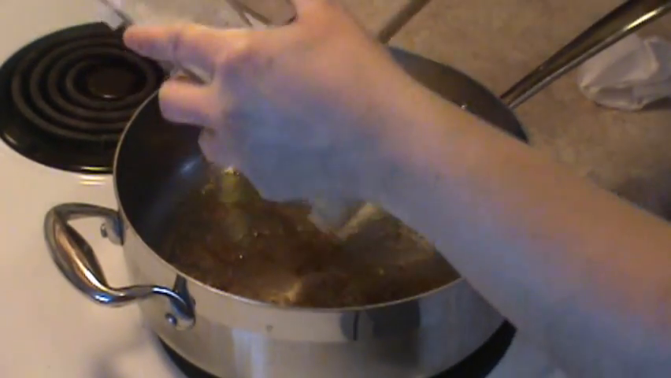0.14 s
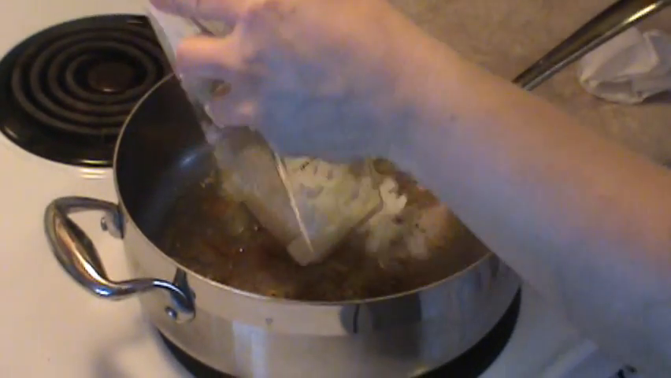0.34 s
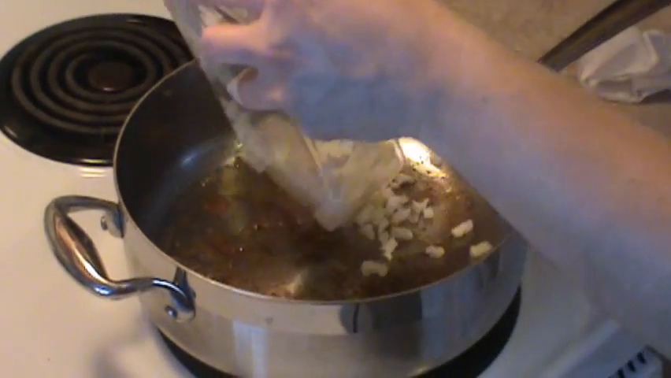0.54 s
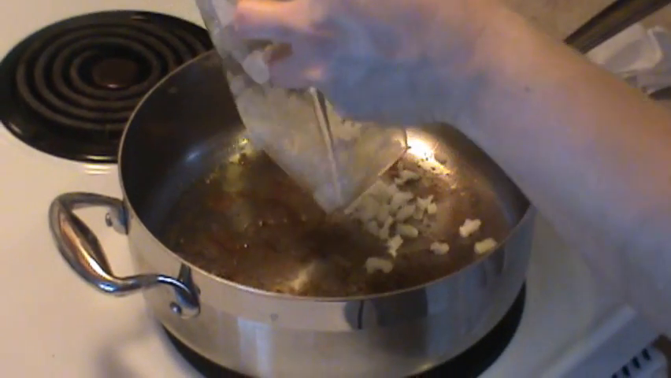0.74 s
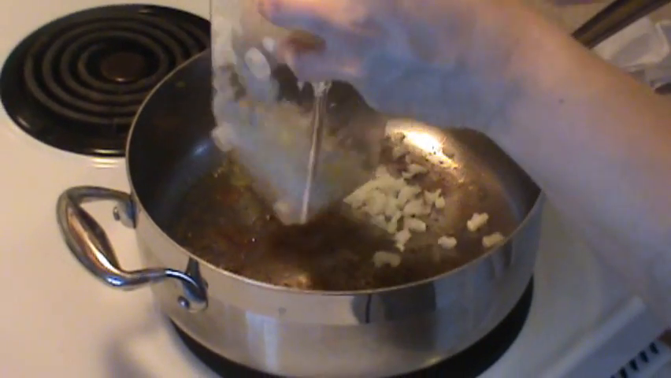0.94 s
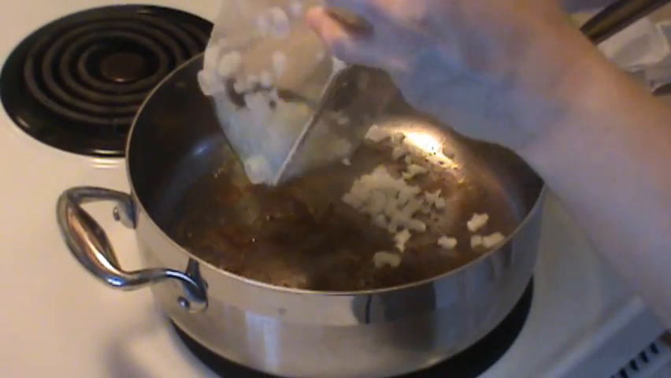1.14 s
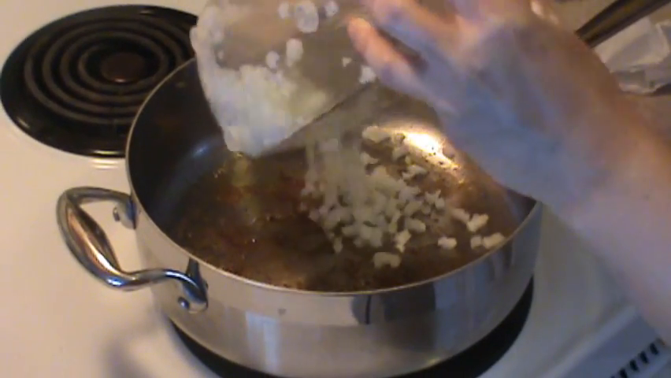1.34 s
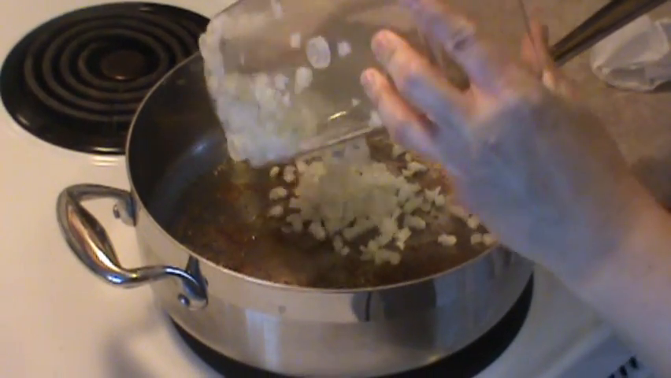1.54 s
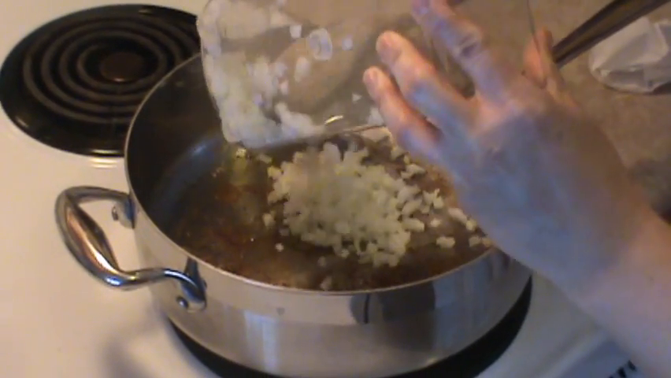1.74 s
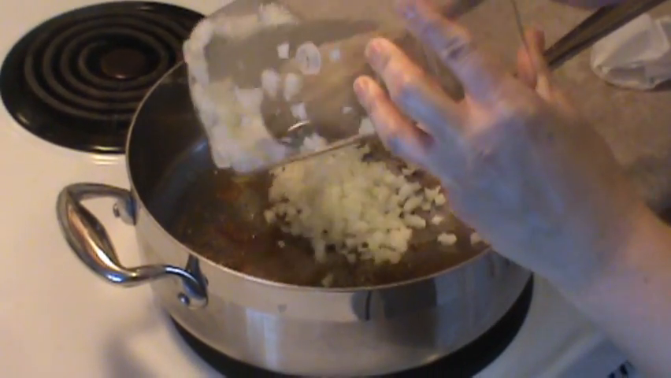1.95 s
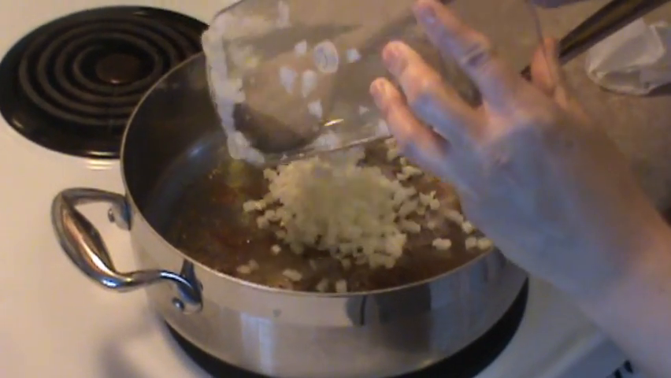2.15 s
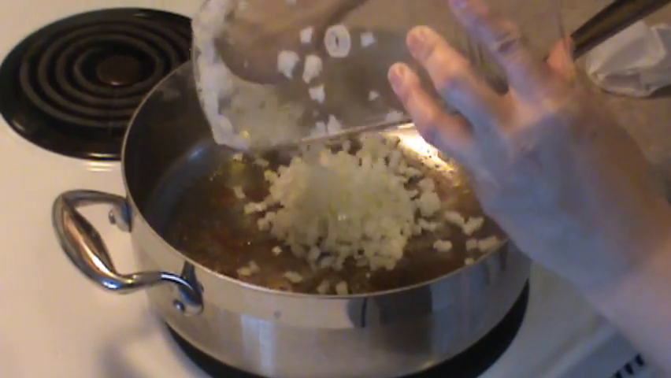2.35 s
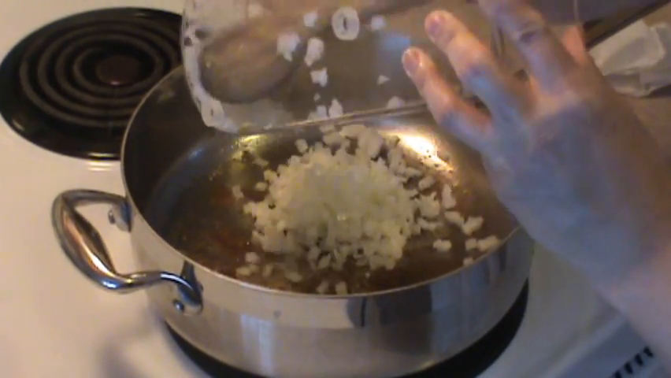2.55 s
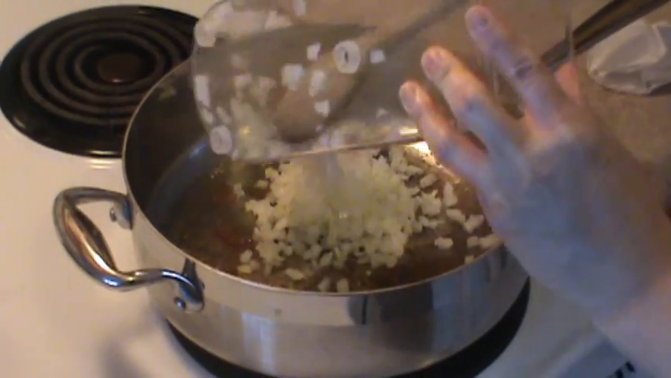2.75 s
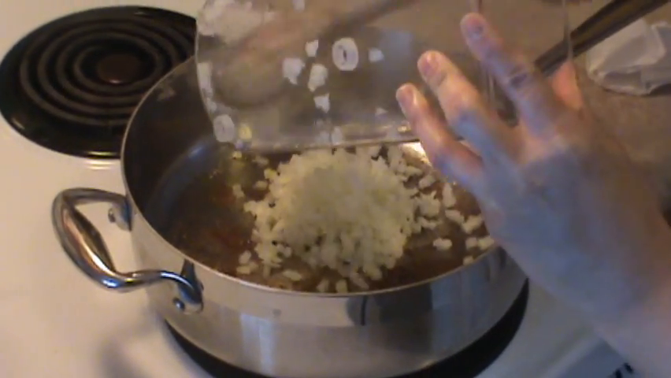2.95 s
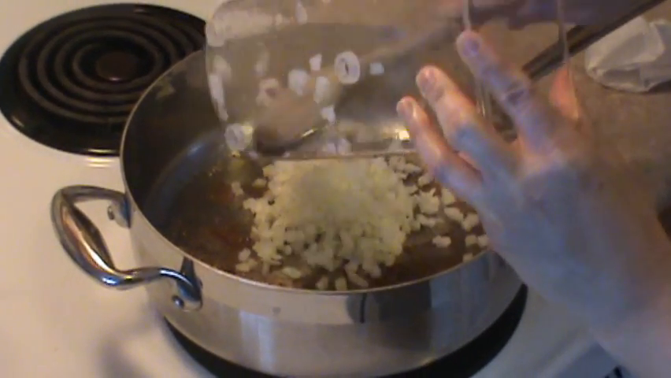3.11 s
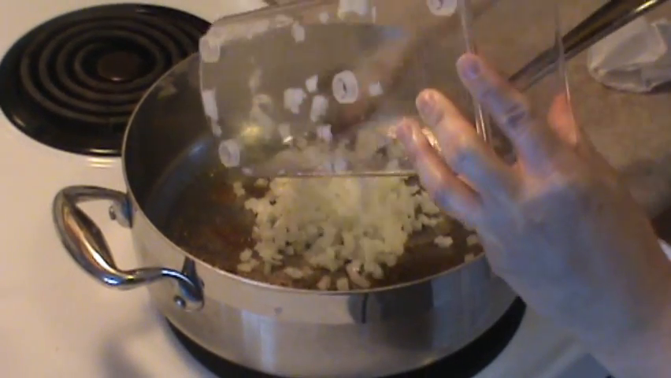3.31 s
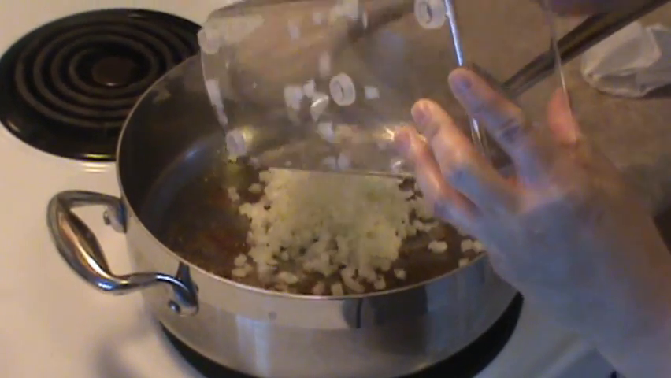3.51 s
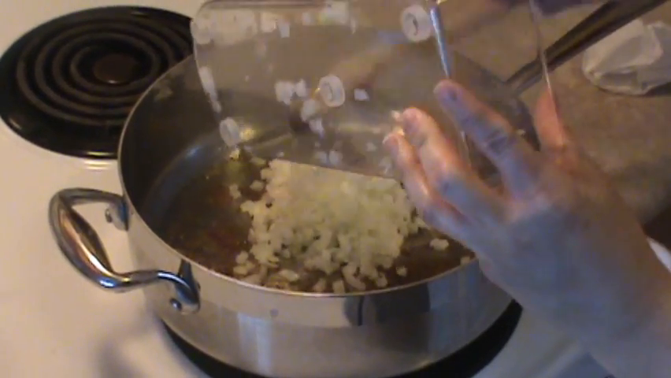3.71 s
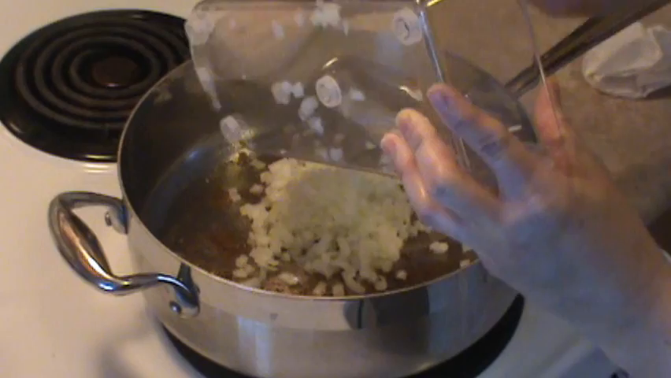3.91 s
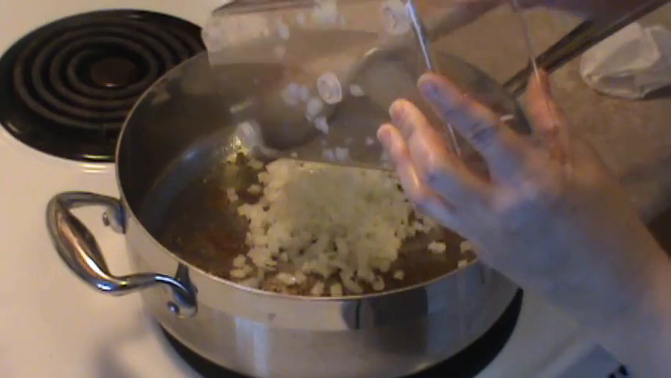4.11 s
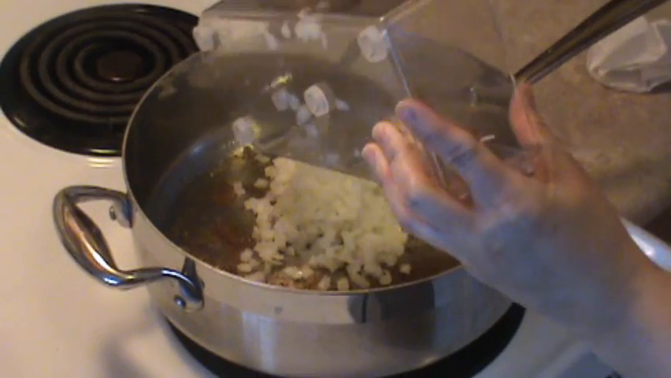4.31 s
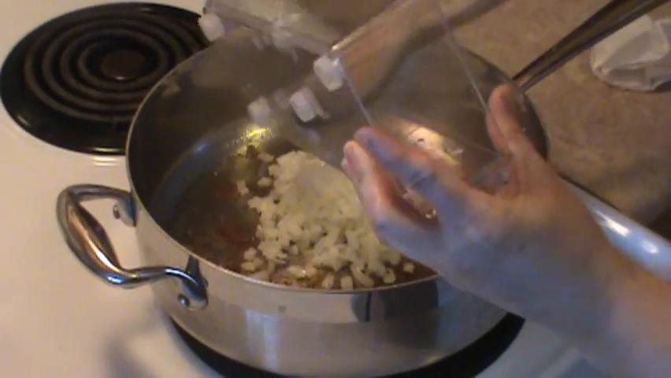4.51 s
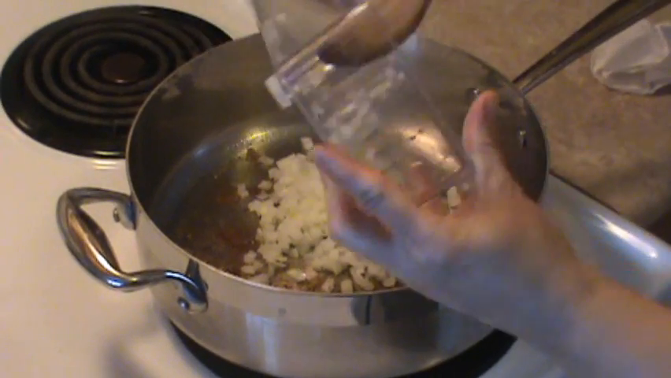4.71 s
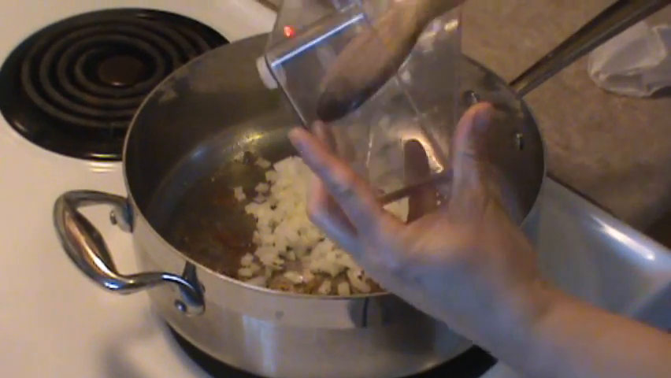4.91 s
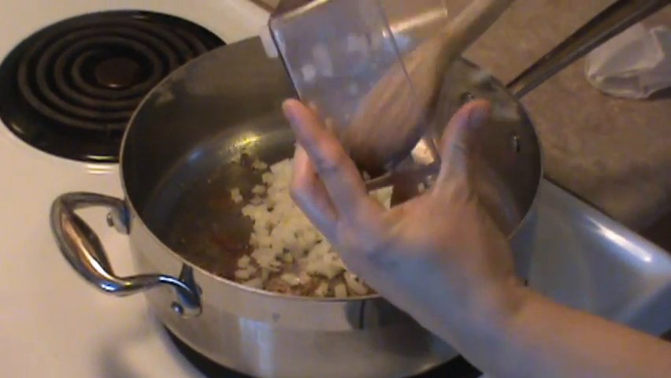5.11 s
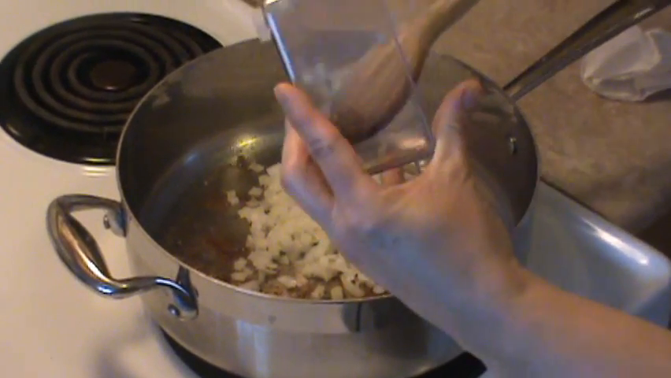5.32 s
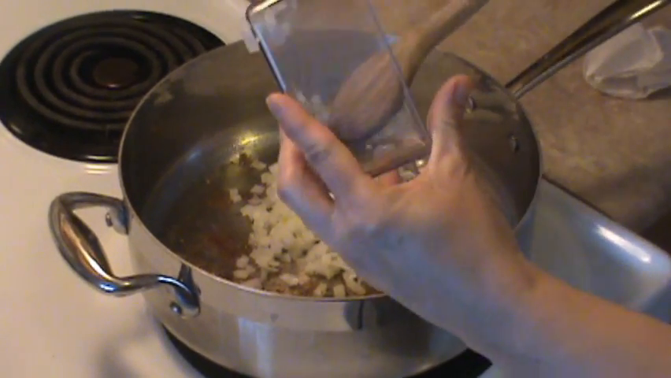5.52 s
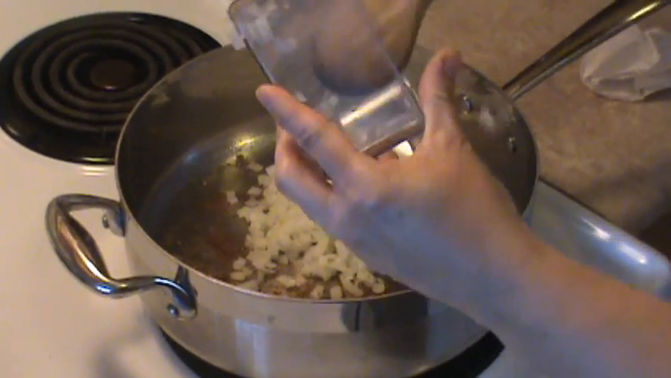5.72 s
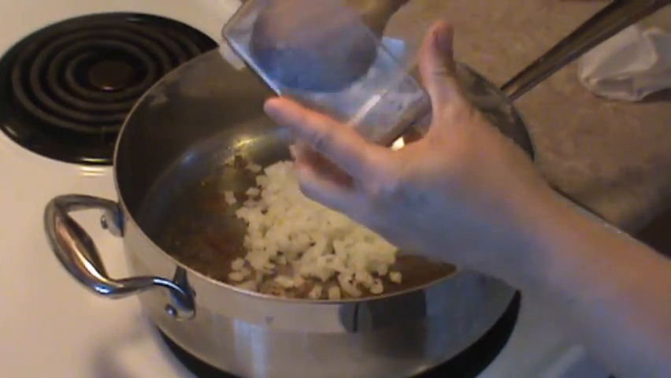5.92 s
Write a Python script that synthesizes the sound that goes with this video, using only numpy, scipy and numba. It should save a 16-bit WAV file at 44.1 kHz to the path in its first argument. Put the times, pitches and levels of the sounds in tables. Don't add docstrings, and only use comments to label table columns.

```python
import sys
import numpy as np
from scipy import signal
from scipy.fft import rfft, irfft
from scipy.io import wavfile
from scipy.ndimage import uniform_filter1d, minimum_filter1d
from numba import njit

SR = 44100
rng = np.random.default_rng(int(sys.argv[2]) if len(sys.argv) > 2 else 0)


def unload_wav(signal):
    wavfile.write(
        sys.argv[1],
        SR,
        np.round(np.clip(np.atleast_2d(signal).T, -1, 1) * 32767).astype(np.int16),
    )


def voltage_ratio(level):
    return 10 ** (np.asarray(level, float) / 20)


N = 267246
T = np.arange(N) / SR
LEAD = 4410


def level(x, db):
    return x * voltage_ratio(db) / np.sqrt(np.mean(x ** 2))


def on_log(table, hz):
    f, v = np.transpose(table)
    return np.interp(np.log(np.maximum(hz, 1)), np.log(f), v)


def colour(x, gain_db):
    cepstrum = irfft(gain_db(np.arange(1025) * SR / 2048) * np.log(10) / 20)
    cepstrum[1:1024] *= 2
    cepstrum[1025:] = 0
    impulse = irfft(np.exp(rfft(cepstrum)))[:1024]
    return signal.oaconvolve(x, impulse)[:len(x)]


def band(x, hz, width):
    edges = [hz - width / 2, min(hz + width / 2, 0.45 * SR)]
    return signal.sosfilt(signal.butter(1, edges, "bandpass", fs=SR, output="sos"), x)


def walk(rate):
    hold = int(SR / rate)
    steps = np.repeat(rng.standard_normal(N // hold + 1), hold)[:N]
    return 1.3 * uniform_filter1d(uniform_filter1d(steps, hold), hold)


@njit
def follower(x, attack, release):
    e, out = 0., np.empty(len(x))
    for i in range(len(x)):
        e += (x[i] - e) * (attack if x[i] > e else release)
        out[i] = e
    return out


def kitchen():
    # [f/Hz, density/dB]
    air_spectrum = [(15, -28), (25, -9.5), (119, -11.5), (300, -8), (1050, -3.5), (1500, -7), (4930, -17.5),
                    (15700, -25)]
    # [f/Hz, width/Hz, level/dB]
    hum = [(79.5, 16, -69.5), (122, 4.6, -78)]
    air = np.array([colour(rng.standard_normal(N), lambda hz: on_log(air_spectrum, hz)) for _ in range(2)])
    drone = 0
    for hz, width, db in hum:
        noise = rng.standard_normal((2, N))
        drone = drone + level(band(band(noise, hz, width), hz, width), db)
    mid, side = level(air, -54.5) + drone
    return mid + 0.37 * side * np.array([[1], [-1]])


def room(x):
    # [f/Hz, t60/s]
    room_t60 = [(250, 0.33), (1000, 0.39), (3000, 0.33), (8000, 0.52)]
    t = np.arange(SR) / SR
    shared, own = rng.standard_normal(SR), rng.standard_normal((2, SR))
    tail = 0
    for hz in 200 * 2 ** np.arange(-0.5, 6, 0.5):
        decay = 1000 ** (-t / on_log(room_t60, hz))
        tail = tail + band(shared + 0.72 * own, hz, hz / 3) * decay
    tail = tail * np.clip((t - 0.002) / 0.0057, 0, 1)
    tail = tail / np.sqrt(np.mean(np.sum(tail ** 2, axis=1)))
    return signal.fftconvolve(x[None], tail, axes=1)[:, :len(x)]


def scrapes():
    # [start/s, length/s, level/dB, ring/Hz]
    strokes = [
        (0.274, 0.076, -52, 606),
        (0.341, 0.035, -50, 2580),
        (0.458, 0.092, -43.5, 943),
        (1.22, 0.11, -49, 930),
        (5.015, 0.056, -45, 680),
        (5.22, 0.086, -70, 641),
    ]
    grip, fade_db = 0.31, 15
    ticks = (rng.random(N) < 900 / SR) * voltage_ratio(3.0 * rng.exponential(size=N)) * rng.standard_normal(N)
    out = np.zeros(N)
    for s, length, db, hz in strokes:
        ring = level(band(ticks, hz, 47), 0)
        rasp = level(band(ticks, 2040, 1200), -6.5)
        along = (T - s) / length
        stroke = np.clip(along / grip, 0, 1) ** 2 * voltage_ratio(-fade_db * np.clip(along - grip, 0, 1))
        out += (ring + rasp) * voltage_ratio(db) * stroke * (along < 1)
    return out


def blow(struck_hz, answer_hz, hard_db):
    # [f/Hz, level/dB, t60/s]
    tub = [(177, 10.5, 0.12), (270, 21, 0.049), (426, 7.5, 0.13), (562, 9.5, 0.17), (604, 8, 0.093),
           (627, 8.5, 0.099), (803, 8, 0.078), (867, 9.5, 0.072), (884, 14.5, 0.03), (1085, 12, 0.065),
           (1206, -1.5, 0.093), (1270, 13, 0.02), (1580, 4, 0.044), (1758, 11.5, 0.027), (1895, 2.5, 0.2),
           (2010, 11, 0.092), (2196, 24.5, 0.012), (2406, 22, 0.029), (2565, 12.5, 0.035),
           (3310, 6.5, 0.021)]
    # [f/Hz, level/dB]
    singers = [(560, -10), (610, -6.5), (890, -10.5), (1240, 3), (1830, 3.5), (2170, -5), (2400, -14),
               (3050, -1)]
    t = np.arange(SR // 5) / SR
    low_hz, high_hz = min(struck_hz, answer_hz), max(struck_hz, answer_hz)
    contact = np.clip(t / (0.00039 * voltage_ratio(-0.75 * hard_db)), 0, 1)

    def away(f):
        return np.minimum(np.abs(np.log2(f / struck_hz)), np.abs(np.log2(f / answer_hz)))

    def fall(f):
        return -7.5 * away(f) + 0.5 * max(np.log2(f / high_hz), 0)

    thud_db = -27 - 12.5 * np.log2(low_hz / 560)
    shape = [(90, thud_db - 17), (170, thud_db + 10.5), (330, thud_db + 4.5),
             (560, fall(660) - 2.2), (1050, fall(900) - 1.5), (2100, fall(1440) - 0.5 + 0.17 * hard_db),
             (3100, fall(2740) / 2 + 0.55 * hard_db + 2.5), (4000, hard_db - 0.5), (5600, hard_db - 4.5),
             (7000, hard_db - 19), (10000, hard_db - 23.5)]

    hz, mode_db, t60 = np.transpose(tub)[:, :, None]
    size, tune, turn = rng.standard_normal((3, len(tub), 1))
    modes = voltage_ratio(mode_db + on_log(shape, hz) + 1.4 * size) * 1000 ** (-t / t60)
    walls = np.sum(modes * np.sin(2 * np.pi * (hz * (1 + 0.011 * tune) * t + turn)), axis=0)

    ringers = list(singers) + [(struck_hz, 4.5), (answer_hz, 0)]
    ring_hz, ring_db = np.transpose(ringers)[:, :, None]
    ring_db = ring_db - 17.5 * away(ring_hz) - 0.14 * min(hard_db + 12, 0)
    ring_t60 = 0.095 * (700 / ring_hz) ** 0.6
    ring = voltage_ratio(ring_db + 12.0) * 1000 ** (-t / ring_t60)
    singing = np.sum(ring * np.sin(2 * np.pi * ring_hz * t), axis=0)

    rattle = rng.standard_normal(len(t)) * contact * voltage_ratio(27.5) * 1000 ** (-t / 0.075)
    crack = voltage_ratio(43 + 0.67 * hard_db) * (t == 0)
    return contact * (walls + singing) + colour(rattle + crack, lambda f: on_log(shape, f))


def knocks():
    # [t/s, peak/dB, wall struck/Hz, wall that answers/Hz, hardness/dB]
    hits = [(-0.042, -16.5, 788, 2080, -11), (0.348, -44, 604, 2530, -15), (0.618, -14, 883, 4010, -3.5),
            (0.666, -19.5, 569, 832, -22), (1.353, -14.5, 1980, 804, 2.5), (1.444, -31, 560, 990, -9),
            (1.98, -18.5, 707, 910, -8.5), (2.422, -15, 1250, 2460, -7.5), (2.441, -17.5, 1338, 909, -31),
            (3.021, -13, 890, 1320, -21), (3.057, -14, 2115, 612, -4), (3.548, -13.5, 567.5, 1234, -2.5),
            (3.993, -10.5, 890, 1810, -5.5), (4.258, -13, 1803, 906, -10.5), (4.448, -21.5, 1027, 620, -4),
            (4.498, -9, 805, 2320, -13), (5.053, -17.5, 1075, 611, -19.5), (5.108, -34, 1260, 950, -33),
            (5.18, -31.5, 602, 588.5, -39), (5.439, -41.5, 935, 600, -1), (5.717, -14, 913, 2460, -10),
            (5.749, -24, 783, 656, -18), (5.947, -24, 615, 1670, -13)]
    out = np.zeros(N + LEAD + SR // 5)
    for s, db, struck_hz, answer_hz, hard_db in hits:
        hit = blow(struck_hz, answer_hz, hard_db)
        i = int(s * SR) + LEAD
        out[i:i + len(hit)] += hit * voltage_ratio(db + 8.0) / np.abs(hit).max()
    return signal.sosfilt(signal.butter(2, 110, "highpass", fs=SR, output="sos"), out[:N + LEAD])


def bubbles(rate, spread_db, flicker_db, spit_db):
    pops = (rng.random(N) < rate / SR) * rng.standard_normal(N)
    spurts = voltage_ratio(spread_db * walk(350) + flicker_db * walk(18))
    spits = (rng.random(N) < 45 / SR) * voltage_ratio(0.84 * rng.exponential(size=N))
    spits = signal.lfilter([1], [1, -np.exp(-1 / (0.00092 * SR))], spits)
    spits = spits * rng.standard_normal(N)
    return level(pops * spurts, 0) + level(spits, spit_db)


def shelve(pair, below_hz, gain_db):
    low = signal.sosfiltfilt(signal.butter(2, below_hz, fs=SR, output="sos"), pair)
    return pair + (voltage_ratio(gain_db) - 1) * low


def sizzle():
    # [t/s, level/dB]
    frying = [(.5, -31.5), (.72, -30), (1.3, -31), (1.5, -27.5), (1.75, -25), (2.3, -25.5), (2.75, -25),
              (3.8, -26.5), (4.2, -27), (4.8, -28.5), (6.06, -29)]
    # [start/s, rise/s, level below the frying/dB]
    catching = [
        (.428, 0.011, -13),
        (.46, 0.0089, -6),
        (.488, 0.014, 0),
    ]
    # [f/Hz, density/dB]
    hiss = [(200, -52), (330, -40), (500, -22), (900, -22), (1400, -19.5), (2300, -13.5), (3600, -8.5),
            (4600, -4.5), (6000, -3), (7300, -7.5), (9000, -3), (10500, -2), (12200, -4), (15700, -14)]
    # [f/Hz, side minus mid/dB]
    hiss_side = [(60, -30), (110, -18), (200, 19), (380, -7), (700, -9), (1290, -20), (2380, -14.5),
                 (4400, -13.5), (8120, -9.5), (15000, -10)]
    # [f/Hz, width/Hz, level/dB]
    pot = [(950, 17, -2.5), (1976, 34, -1), (2555, 22, 6), (3120, 14, 5)]

    steps = [voltage_ratio(db) * np.clip((T - s) / rise_s, 0, 1) ** 2 for s, rise_s, db in catching]
    heat = np.max(steps, axis=0) * voltage_ratio(np.interp(T, *np.transpose(frying)))
    since = np.maximum(T - catching[0][0], 0)

    def pot_db(hz):
        return on_log(hiss, hz) + sum(g / (1 + (2 * (hz - f) / w) ** 2) for f, w, g in pot)

    mid, side = (bubbles(rate=24000, spread_db=-0.52, flicker_db=0.5, spit_db=-12.5) for _ in range(2))
    mid = colour(mid, pot_db)
    side = colour(side, lambda hz: pot_db(hz) + on_log(hiss_side, hz))
    ringing = sum(level(band(mid, hz, width / 2), db) * np.std(mid) for hz, width, db in pot)
    mid = mid + voltage_ratio(-27) * np.exp(-since / 1.6) * ringing
    pair = mid + side * np.array([[1], [-1]])
    pair = shelve(pair, 4500, -2.5 - 11 * np.exp(-since / 0.25) + 1.28 * since)
    pair = shelve(pair, 7500, -7 * np.exp(-since / 0.04))
    return level(pair, 2.57) * heat * voltage_ratio(np.array([[0.2], [-0.2]]))


def scene():
    spoon = knocks() + np.pad(scrapes(), (LEAD, 0))
    near = spoon * voltage_ratio(np.array([[0.8], [-0.8]]))
    tub = near + voltage_ratio(-2.5) * room(spoon)
    return tub[:, LEAD:] + sizzle() + kitchen()


def band_limit(x):
    return signal.sosfilt(signal.butter(12, 15870, fs=SR, output="sos"), x)


def record(dry):
    ahead = 110
    coming = -minimum_filter1d(-np.abs(dry).max(axis=0), size=ahead, origin=-ahead // 2)
    peak = follower(coming, 1 / (0.0004 * SR), 1 / (0.016 * SR))
    gain = (1 + (peak / voltage_ratio(-9.3)) ** 6) ** (-1 / 6)
    top = signal.ellip(10, 0.2, 70, 15720, fs=SR, output="sos")
    return band_limit(signal.sosfilt(top, dry * gain))


dry = scene()
out = record(dry)
unload_wav(out)
```